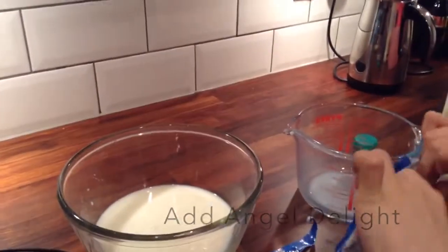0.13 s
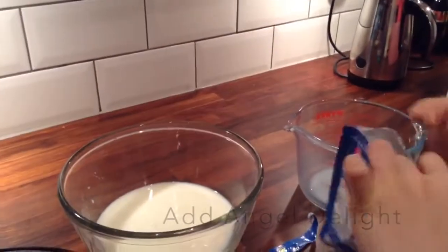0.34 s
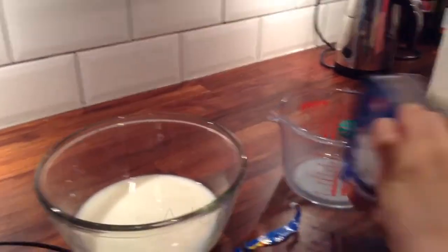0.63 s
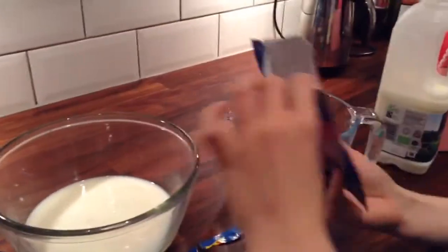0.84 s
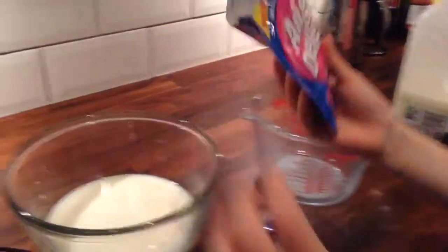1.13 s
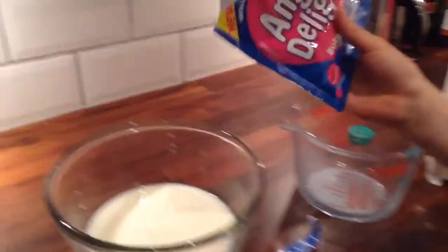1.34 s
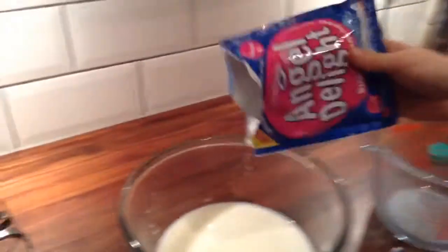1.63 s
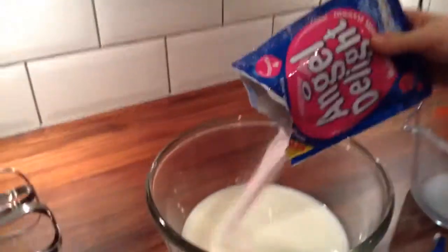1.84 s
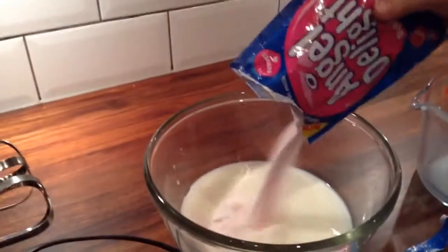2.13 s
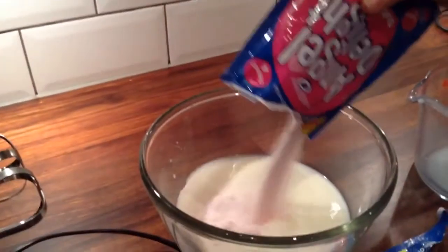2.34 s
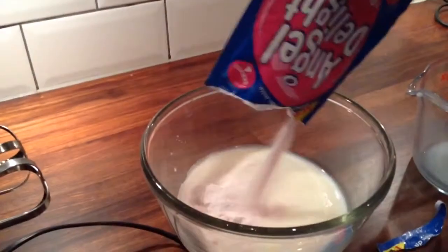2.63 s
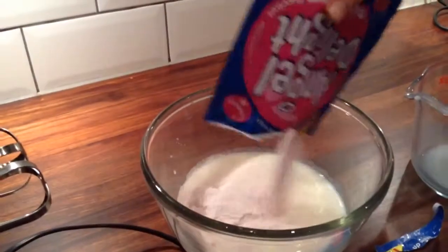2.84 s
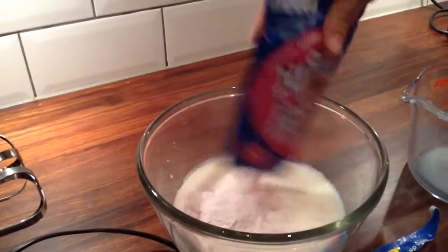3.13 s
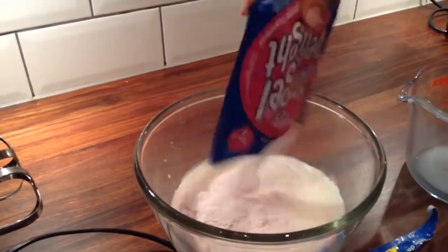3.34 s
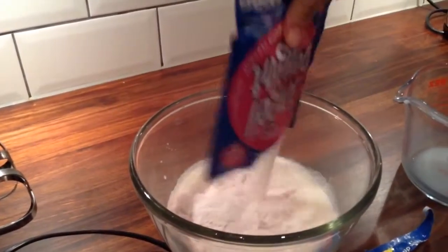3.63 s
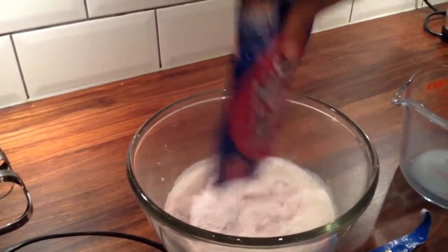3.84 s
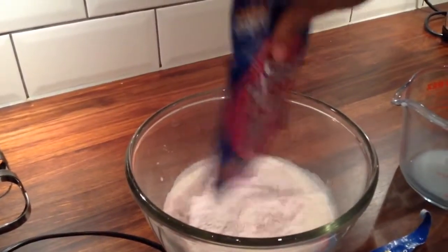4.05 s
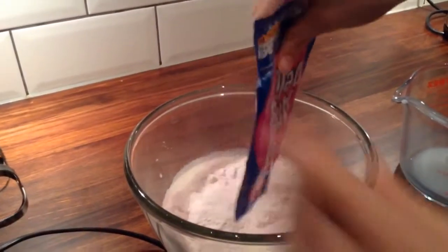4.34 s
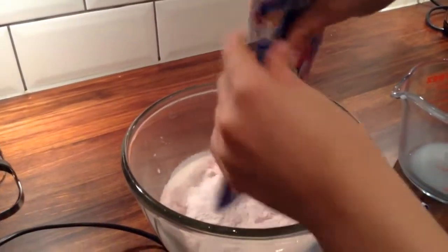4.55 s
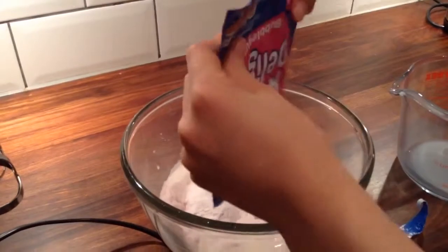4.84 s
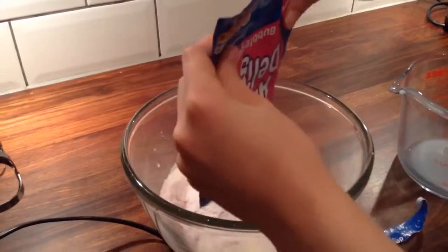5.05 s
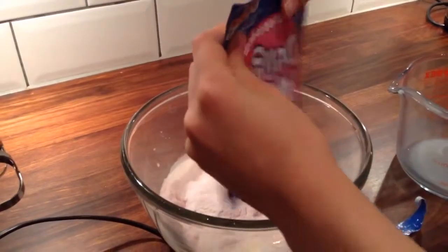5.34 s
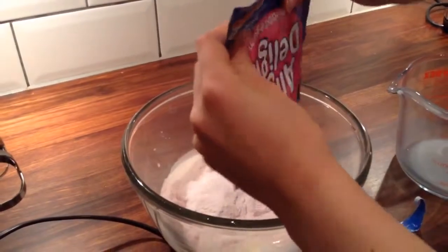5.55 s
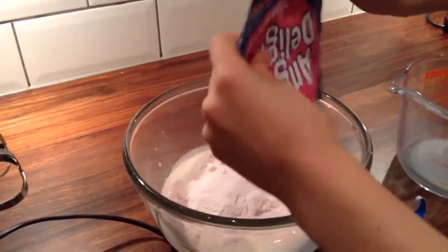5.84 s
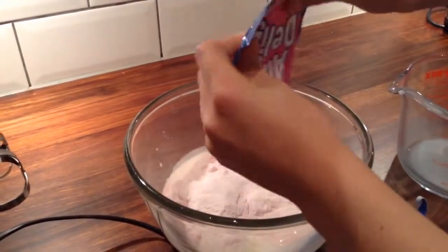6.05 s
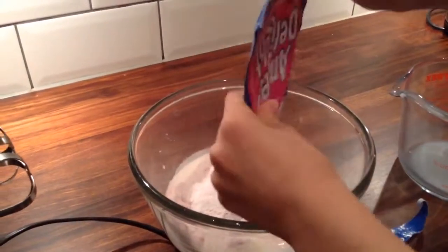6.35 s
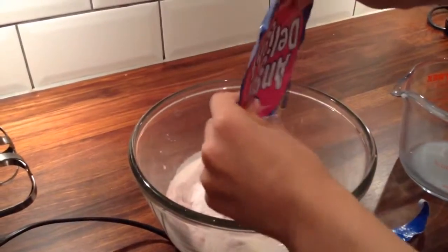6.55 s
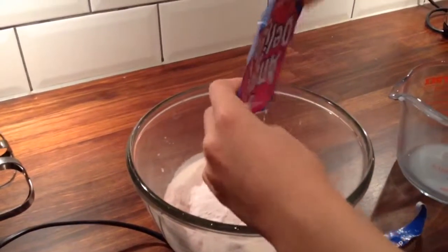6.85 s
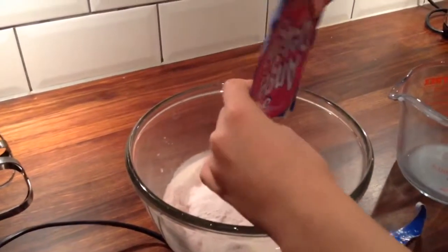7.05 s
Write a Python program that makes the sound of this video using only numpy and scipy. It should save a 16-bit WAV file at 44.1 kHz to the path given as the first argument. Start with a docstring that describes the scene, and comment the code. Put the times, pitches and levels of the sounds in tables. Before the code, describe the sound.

Crisp crackling film close by, one hard pop, then a quieter stretch of small handling bumps. Dry powder runs out in a grainy hiss with rhythmic shakes, ending as scattered film snaps grow into busy crumpling. A bowl's hollow adds faint ringing and tiles give short reverberation. Steady low room noise with a thin appliance hum lies beneath, picked up by a small nearby microphone.

```python
"""A plastic sachet is pulled open in sharp snaps, carried over a glass bowl of milk in a tiled kitchen, and shaken.
First the stiff film buckles: panels ring, the pouch puffs and creases crack, with rustling under the fingers.
Small dull knocks follow as the sachet is tipped; then powder hisses out as dense grains, surging with each shake.
Later the film snaps and rustles again, coloured by resonances of the bowl's hollow and by close echoes.
Soft handling bumps come and go; filtered noise and a thin hum form a low room drone throughout."""
import sys
import numpy as np
from scipy import signal
from scipy.fft import rfft, irfft, next_fast_len
from scipy.io import wavfile

SR = 44100
rng = np.random.default_rng(int(sys.argv[2]) if len(sys.argv) > 2 else 0)


def put_to_file(sound):
    """Save the sound as 16-bit audio at rate SR, in the file named by the first command-line argument."""
    columns = np.atleast_2d(sound).T  # one column per channel
    safe = np.clip(columns, -1, 1)
    whole_steps = np.round(safe * 32767)
    wavfile.write(sys.argv[1], SR, whole_steps.astype(np.int16))


N = 317079
T = np.arange(N) / SR  # time [s]
FILTERS = {}  # band-passes, designed once each
# kitchen reverberation times [s]
PUFF_T60, PANEL_T60, CRACK_T60, EDGE_T60 = 0.59, 0.4, 0.46, 0.32
# film patches set ringing by small creases and buckles: (pitch [Hz], relative level [dB])
FILM_PATCHES = [(420, -2), (560, 1.5), (720, -12.5), (900, -2.5), (1100, 2), (1300, -1), (1500, -2.5),
                (1750, -1), (2050, -2.5), (2500, -8)]


def from_db(db):
    """Decibels to gain."""
    return 10 ** (np.asarray(db) / 20)


def rms_one(x):
    """Scale to unit power."""
    return x / np.sqrt(np.mean(x ** 2) + 1e-20)


def level_curve(rows):
    """Gain over time from (time [s], level [dB]) rows, fading to silence beyond their ends."""
    s, db = np.transpose(rows)
    fade = np.interp(T, [s[0] - .03, s[0], s[-1], s[-1] + 0.019], [0, 1, 1, 0])
    return from_db(np.interp(T, s, db)) * fade


def at_hz(points, hz):
    """Read a spectrum on a log-frequency scale."""
    table = np.array(points)
    return np.interp(np.log(hz + 1), np.log(table[:, 0]), table[:, 1])


def band(x, low_hz, high_hz, order=2):
    """Causal band-pass."""
    edges = (order, low_hz, min(high_hz, .45 * SR))
    if edges not in FILTERS:
        FILTERS[edges] = signal.butter(order, edges[1:], "band", fs=SR, output="sos")
    return signal.sosfilt(FILTERS[edges], x)


def resonance(x, hz, width_hz):
    """Two-pole resonance with gain 1 on top."""
    r = np.exp(-np.pi * width_hz / SR)
    feedback = [1, -2 * r * np.cos(2 * np.pi * hz / SR), r * r]
    return signal.lfilter(np.array([1, 0, -1]) * (1 - r * r) / 2, feedback, x)


def coloured(x, spectrum):
    """Give a steady sound a spectrum; unit power."""
    size = next_fast_len(N)
    gain = from_db(at_hz(spectrum, np.fft.rfftfreq(size, 1 / SR)))
    return rms_one(irfft(rfft(x, size) * gain, size)[:N])


def drift(rate):
    """Smooth chance of unit power, with `rate` new values per second."""
    knots = rng.standard_normal(2000)
    return rms_one(np.interp(T * rate, np.arange(len(knots)), knots))


def grains(per_s, spread_db, size=N):
    """Random clicks of either sign, their levels in dB spread exponentially."""
    clicks = np.zeros(size)
    at = np.flatnonzero(rng.random(size) < per_s / SR)
    excess = rng.standard_exponential(size)[at]
    sign = np.sign(rng.random(size)[at] - .5)
    clicks[at] = sign * from_db(spread_db * np.minimum(excess, 4))
    return clicks


def gesture(s, rise_s, hold_s, fall_s):
    """A movement builds up, holds and dies away."""
    rise = np.clip((T - s) / rise_s, 0, 1)
    return rise * np.exp(-np.clip((T - s - rise_s - hold_s) / fall_s, 0, 20))


def add(track, s, sound):
    """Mix a sound in at a given time."""
    at = max(0, round(s * SR))
    track[at:at + len(sound)] += sound[:max(0, N - at)]


def snaps(settle_s=0.0043, crease_s=0.0075, panel_flip=0.55, panel_room_db=-0.65, clean_above_db=-42,
          firm_db=22, room_db=-5.5, close_room_db=-12, level_db=-3.5):
    """Each buckle rings a panel of film, puffs the pouch, cracks along a crease and fizzes at the top."""
    # buckles of the film: (time [s], panel pitch [Hz], panel level before level_db [dB],
    # crack level re panel [dB], top edge level re panel [dB], relative strength of the first flip [ratio])
    buckle_events = [(0.056, 1460, -48, -4, -5.5, .3), (0.079, 1000, -48, -14, -18, .5),
                     (0.1208, 1450, -43.5, -13, -12, 1.1), (0.1672, 1330, -38.5, -14.5, -12.5, 0.42),
                     (0.189, 1750, -48, -22, -29, .3), (0.206, 1780, -56.5, -22, -28, .3),
                     (0.237, 1700, -68, -26, -25, .3), (0.316, 1250, -49, -22, -34, .2),
                     (0.323, 1530, -52, -33, -30, .2), (0.3614, 880, -49.5, -10, -26, 1.4),
                     (0.3751, 1470, -29, -4.5, -6, 0.18), (0.693, 1990, -62.5, -14, -20, .3),
                     (0.7317, 890, -52, -11, -32, 1.1), (0.796, 1420, -52, -22, -30, 0.92),
                     (0.9223, 1390, -47, -9, -7.5, 1.4), (3.1394, 1740, -48, -7.5, -8, .7),
                     (3.1739, 1540, -56, -8, -18, .6), (3.2387, 1070, -59, -7, -10, 0.58),
                     (3.344, 1820, -52, -8, -25, 1.2), (3.3632, 1110, -45.5, -10, -25, .6),
                     (3.3743, 1650, -39.5, -4, -19, 0.65), (3.3881, 1350, -36.5, -4, -22, 0.75),
                     (3.402, 1900, -56, -2, -18, .7), (3.443, 2000, -58, -12, -24, .5),
                     (3.492, 1110, -60.5, -6, -20, .5), (3.5903, 1150, -40, -11, -20, 0.25),
                     (3.651, 780, -55.5, -14, -22, 0.77), (3.8983, 1540, -63, -6, -20, .8),
                     (4.048, 740, -54, -18, -22, 0.44), (4.0782, 1720, -32, -2.5, -8, .25),
                     (4.1054, 2070, -34.5, -12, -30, .9), (4.1324, 1880, -32, -2.5, -2.5, 0.28),
                     (4.292, 2260, -56, -11, -9, .4), (4.3357, 1870, -42.5, -2, -20, 0.47),
                     (4.371, 1030, -43.5, -2.5, -17, 0.23), (4.585, 900, -55.5, -7, -13, 0.46),
                     (4.601, 1020, -54, 1, -7, 0.5), (4.632, 700, -54, -19, -11, 0.43),
                     (4.6459, 1040, -48, -2, -10, .9), (4.6704, 1580, -34.5, 10.5, 4, 1.1),
                     (4.679, 1720, -41, 5.5, -9, .4), (4.6995, 1500, -44, 4, -13, 0.66),
                     (4.856, 1150, -52.5, -7, -10, .5), (4.8723, 2034, -43, 0.5, -15, 1.5),
                     (4.896, 1210, -47.5, -6, -18, .4), (4.9076, 1220, -48, 6.5, -6, 0.54),
                     (4.938, 1130, -52, 13.5, 9, 0.62), (4.9547, 1290, -42, -4, -8, .8),
                     (4.9605, 700, -46.5, -11, -18, 0.66), (5.0487, 1140, -50.5, -5, -6, 1.4),
                     (5.1922, 1170, -59.5, -5, -3, 0.32), (5.229, 1620, -51, 1, 3, 0.63),
                     (5.353, 1060, -50.5, -16, -3, .6), (5.3778, 730, -44, -18, -9, 0.54),
                     (5.389, 1140, -44.5, -3, -9, .5), (5.398, 900, -54.5, 6, 10, 0.36),
                     (5.418, 1400, -41, -8.5, -26, 0.31), (5.5586, 1320, -52, -6, -25, 0.71),
                     (5.64, 1520, -46, -9, -12, .3), (5.662, 1500, -44.5, -4, -6, 0.4),
                     (5.7657, 1160, -49.5, -3, -8, .4), (5.785, 850, -40, -7, -11, 0.98),
                     (5.7891, 1520, -40.5, 4, -3.5, .6), (5.8198, 1590, -41, 2, -9, 0.52),
                     (5.8309, 1080, -42.5, -3, -25, 1.2), (5.887, 1530, -46.5, -6, -21, 0.76),
                     (5.94, 1400, -49, 1.5, -10, 0.89), (5.9832, 850, -37, -2.5, -8, .6),
                     (6.005, 700, -46, 0, -8, 0.55), (6.036, 1190, -47.5, 1.5, -22, 0.8),
                     (6.05, 1270, -42, -10, -24, 0.62), (6.09, 1010, -53, -11, -19, 0.68),
                     (6.1431, 910, -55, -3, -14.5, 0.55), (6.1942, 960, -49.5, -15, -16, 0.81),
                     (6.225, 1530, -59, -17, -18, 0.62), (6.272, 1540, -60, 0, -2, 0.8),
                     (6.298, 695, -60, 7, 3, .5), (6.362, 1100, -44.5, -4, -15, 0.32),
                     (6.3857, 1120, -47.5, 5, -6, 0.59), (6.392, 1080, -39, -12, -18, 0.22),
                     (6.432, 1100, -54, -6, -4, 0.57), (6.4777, 1110, -43.5, 1, 3, 0.38),
                     (6.4968, 1070, -51.5, 14, 6.5, 0.46), (6.521, 695, -51, -4, -18, .8),
                     (6.723, 1160, -48.5, -2.5, -18, 0.45), (6.7536, 1250, -55.5, 1.5, 2, 0.54),
                     (7.15, 1410, -49.5, 2, -3.5, 0.33)]
    # the puff is weaker in the early snaps: (time [s], puff level change [dB])
    puff_change = [(0.4, -5), (1.7, 1), (3.3, 1)]
    # strength of the later slips: (time [s], factor [0-1])
    slip_strength = [(0.4, 0.72), (3.3, 0.6)]
    # overtone grows with hardness: (panel level [dB], overtone share [ratio], top of ring over pitch [ratio])
    hardness = [(-51.5, 0.055, 1.61), (-39, 0.13, 1.91), (-27, 0.4, 1.5)]
    # a puff takes up only part of a harder snap: its level at a typical panel level, and dB per panel dB
    typical_puff_db, typical_panel_db, puff_follows = -50, -44, 0.69
    crease_centre_hz, scatter_octaves = 5000, 0.18
    hard_db, overtones, top_ratios = np.transpose(hardness)
    out = np.zeros(N)
    for s, hz, panel_db, crack_db, edge_db, flip in buckle_events:
        # hard snaps flip in one go, gentle ones crumple for longer
        loose = np.clip(1.0 - (panel_db - clean_above_db) / firm_db, .4, 1.3)
        # around 0.38 s the sachet is close by, then it is held further off
        wet_db = np.interp(s, [.2, .38, .9], [room_db, close_room_db, room_db])
        db = panel_db + level_db
        puff_db = typical_puff_db + puff_follows * (panel_db - typical_panel_db) + level_db
        puff_db += np.interp(s, *np.transpose(puff_change))
        crease_hz = crease_centre_hz * 2 ** (scatter_octaves * (2 * rng.random() - 1))
        slips = settling() * np.interp(s, *np.transpose(slip_strength))
        overtone = np.interp(panel_db, hard_db, overtones)
        top_ratio = np.interp(panel_db, hard_db, top_ratios)

        def ring(x):
            return panel(x, hz, overtone=overtone, top_ratio=top_ratio)

        def ring_all_sides(x):
            # the room hears all sides of the film, so more of its other modes
            return panel(x, hz, 0.4, overtone, top_ratio)

        add(out, s, snap_part(ring, db, settle_s * loose, panel_flip * flip, slips,
                              PANEL_T60, wet_db + panel_room_db, room_body=ring_all_sides))
        add(out, s, snap_part(pouch, puff_db, 0.0085 * loose, panel_flip * flip, slips, PUFF_T60, wet_db))
        add(out, s, snap_part(lambda x: crease(x, crease_hz), db + crack_db, crease_s * loose, flip, slips,
                              CRACK_T60, wet_db))
        add(out, s, snap_part(top_edge, db + edge_db, crease_s * loose, flip, slips, EDGE_T60, wet_db))
    return out


def snap_part(body, level_db, settle_s, flip, slips, t60, room_db, room_body=None):
    """A buckle, its later slips and its reverberation, heard through one resonant part of the sachet."""
    direct = body(buckle(T[:len(slips)], settle_s, flip) + slips + 1e-18)
    tail = (room_body or body)(kitchen(T[:SR // 4], t60))
    sound = from_db(room_db) * tail / np.linalg.norm(tail)
    sound[:len(direct)] += direct / np.linalg.norm(direct)
    # the level is the power of the direct sound spread over 10 ms
    return from_db(level_db) * np.sqrt(SR / 100) * sound


def buckle(t, settle_s, flip, build_s=0.00065):
    """One sudden flip of the film, then a flurry of smaller slips that spreads and dies; unit energy."""
    flurry = rng.standard_normal(len(t)) * np.exp(-t / settle_s) * (1 - np.exp(-t / build_s))
    push = flip * (t == 0) + flurry / np.linalg.norm(flurry)
    return push / np.linalg.norm(push)


def settling(slips_per_s=130, spread_db=2.5, relax_s=.022, level_db=-8):
    """After a buckle the film relaxes in a few small, uneven slips."""
    t = T[:SR // 14]
    slips = grains(slips_per_s, spread_db, len(t)) * np.exp(-t / relax_s)
    return from_db(level_db) * slips / (np.linalg.norm(slips) + 1e-9)


def panel(x, hz, broad=.12, overtone=.1, top_ratio=1.8, low_share=.62, q=4.2, overtone_ratio=1.76):
    """A patch of film rings briefly at its own pitch and an overtone, over a spread of other modes."""
    ring = resonance(x, hz, hz / q) + overtone * resonance(x, hz * overtone_ratio, hz / q)
    return band(ring + broad * x, low_share * hz, np.clip(top_ratio * hz, 1700, 3100), order=3)


def pouch(x, boom_hz=192, width_hz=80, boom=0.42):
    """The air in the pouch gives a dull puff with a short low boom."""
    return band(x + boom * resonance(x, boom_hz, width_hz), 168, 783, order=4)


def crease(x, hz, q=4.0):
    """A crease cracks over a broad band and rings very briefly at its own pitch."""
    return band(band(x, 3300, 5030, order=1) + resonance(x, hz, hz / q), 2260, 7700)


def top_edge(x):
    """The topmost band of a crack gives it a crisp edge."""
    return band(band(x, 4900, 8750, order=1), 7150, 14700)


def rustle(clump_db=-0.5, creases_per_s=70, patch_width_hz=170, crumple_level_db=-4, buckles_db=-5, cracks_db=-8):
    """Under each grip tiny creases give way in clumps and patches flip; sliding skin hisses with cracks."""
    # the fingers shift their grip and work the film:
    # (time [s], length [s], relative crumple level [dB], relative slide level [dB])
    grips = [(-0.02, 0.083, -54, -67.5), (0.122, 0.06, -57, -61.5), (0.719, 0.054, -61, -60.5),
             (0.849, 0.13, -60, -69.5), (3.619, 0.11, -63.5, -66.5), (4.215, 0.2, -63, -64),
             (4.587, 0.15, -53.5, -73), (4.863, 0.16, -64, -60), (5.202, 0.043, -57, -60),
             (5.292, 0.11, -59.5, -58), (5.647, 0.034, -53, -58), (5.772, 0.15, -56, -61.5),
             (5.975, 0.08, -54, -61), (6.1, 0.28, -68.5, -72.5), (6.392, 0.135, -55, -59.5),
             (6.763, 0.05, -60, -61.5)]
    # hiss of sliding skin: (frequency [Hz], relative level [dB per Hz])
    slide_spectrum = [(500, -24), (2000, -26), (3500, 2.5), (5500, -2.5), (9000, -4.5), (15000, -15)]
    rise_share, fall_s = 0.36, 0.0043
    clumps = from_db(clump_db * drift(110))
    creases = np.zeros(N)
    for hz, db in FILM_PATCHES:
        clicks = grains(creases_per_s, spread_db=0.0) * clumps
        creases += from_db(db) * resonance(clicks, hz, patch_width_hz)
    rings, cracks = small_buckles()
    crumple = from_db(crumple_level_db) * rms_one(band(creases, 150, 4200)) + from_db(buckles_db) * rings
    hiss = coloured(grains(1800, spread_db=2.5) * clumps, slide_spectrum)
    slide = hiss + from_db(cracks_db) * cracks
    out = np.zeros(N)
    for s, length_s, crumple_db, slide_db in grips:
        movement = gesture(s, rise_share * length_s, (1 - rise_share) * length_s, fall_s)
        out += movement * (from_db(crumple_db) * crumple + from_db(slide_db) * slide)
    return out


def small_buckles(per_patch_per_s=8.0, settle_s=0.0019, puff_db=-8):
    """Patches flip at random: their rings with a faint puff, and their cracks; each of unit power."""
    flips = []
    for _ in FILM_PATCHES:
        clicks = grains(per_patch_per_s, spread_db=-1.0)
        push = buckle(T[:SR // 20], settle_s, flip=0.63)
        flips.append(signal.oaconvolve(clicks, push)[:N] + 1e-18)
    rings = sum(from_db(db) * panel(flip, hz) for flip, (hz, db) in zip(flips, FILM_PATCHES))
    cracks = band(sum(flips), 2800, 8800)
    puffs = band(sum(flips), 150, 356, order=3)
    return rms_one(rms_one(rings) + from_db(puff_db) * rms_one(puffs)), rms_one(cracks)


def powder(level_db=-1, flutter_db=2.0):
    """Countless grains slide over the film: a trickle, and a surge with each shake."""
    # powder running out of the tipped sachet: (time [s], flow level before level_db [dB])
    pour = [(1.58, -71.5), (1.74, -58), (1.85, -60.5), (2.41, -62.5), (2.57, -73), (2.75, -65),
            (3.0, -64.5), (3.55, -59.5), (3.9, -74), (4.5, -74)]
    # each shake throws out a surge: (time [s], surge level before level_db [dB])
    shakes = [(2.24, -59.5), (2.82, -66), (3.027, -57.5), (3.24, -59), (3.48, -65), (3.742, -62.5),
              (3.955, -57), (4.22, -61), (4.5, -64.5)]
    # hiss of the grains: (frequency [Hz], relative level [dB per Hz])
    powder_spectrum = [(300, -12), (800, -10), (1500, 0), (2600, -8.5), (4000, -1), (6500, 1),
                       (10000, -0.5), (15000, -4.5)]
    flow = level_curve(pour)
    for s, db in shakes:
        flow += from_db(db) * gesture(s, rise_s=0.023, hold_s=0.035, fall_s=0.045)
    stream = grains(14000, spread_db=3.0) * from_db(flutter_db * drift(23.06))
    return from_db(level_db) * flow * band(coloured(stream, powder_spectrum), 220, 19000)


def bumps(level_db=2, width_hz=110, knock=0.61, room=0.34):
    """Soft, heavily damped knocks of the handling."""
    # (time [s], peak level before level_db [dB], pitch [Hz])
    bump_events = [(0.154, -51, 172), (0.71, -51, 196), (1.443, -49, 190), (1.553, -55, 160),
                   (1.606, -54.5, 205), (1.748, -42.5, 178), (1.79, -58, 160), (1.9, -63, 240),
                   (2.052, -52, 165), (2.11, -57.5, 310), (2.331, -60, 326), (3.001, -61, 180),
                   (4.026, -45, 230), (4.992, -47.5, 198), (5.232, -50.5, 192), (6.184, -49.5, 204),
                   (6.299, -50, 201), (6.494, -41, 192)]
    out, t = np.zeros(N), T[:SR // 3]
    for s, peak_db, hz in bump_events:
        push = buckle(t, settle_s=0.014, flip=1.0) + room * kitchen(t, PUFF_T60)
        thud = rms_one(band(resonance(push, hz, width_hz), 131, 446, order=3))
        thud += knock * rms_one(band(push, 185, 514))
        add(out, s, from_db(peak_db + level_db) * thud / np.abs(thud).max())
    return out


def fumbling(level_db=-75, knocks_per_s=45, start_s=1.0, rise_s=0.17, hold_s=0.87, fall_s=0.22):
    """Small dull knocks while the sachet is carried over and tipped."""
    knocks = rms_one(band(grains(knocks_per_s, spread_db=5.0), 136, 307, order=3))
    return from_db(level_db) * gesture(start_s, rise_s, hold_s, fall_s) * knocks


def bowl(x, far_db=-12, near_db=-1.5):
    """The air in the bowl's hollow resonates, answering more as the sachet comes over it."""
    # (pitch [Hz], width [Hz], level before the nearness gain [dB])
    bowl_modes = [(560, 34, -16), (660, 16, 0.5), (783, 39, 1), (1107, 43, 7), (1530, 110, 1.5),
                  (1963, 120, 0.5), (2010, 29, -32), (2500, 740, 1)]
    nearness = from_db(np.interp(T, [1.2, 2.2], [far_db, near_db]))
    return x + sum(from_db(db) * resonance(x * nearness, hz, width_hz) for hz, width_hz, db in bowl_modes)


def reflections(x):
    """Bowl, worktop and tiles throw back close echoes."""
    # (delay [s], level [dB])
    echoes = [(.0029, -32), (.0088, -36), (0.0094, -20)]
    out = x.copy()
    for delay_s, db in echoes:
        add(out, delay_s, from_db(db) * x)
    return out


def kitchen(t, t60, build_s=.010):
    """The room's answer to a click, of unit energy; new each time, since the sachet keeps moving."""
    decay = np.exp(-np.log(1000) * t / t60)
    tail = (rng.random(len(t)) - .5) * decay * np.minimum(t / build_s, 1)
    return tail / np.linalg.norm(tail)


def background(floor_db=-68, hum_hz=229.3, hum_db=-74, wander_hz=0.92, waver_db=1.0):
    """Steady room noise with the thin, slightly wavering hum of an appliance."""
    # room noise: (frequency [Hz], relative level [dB per Hz])
    floor_spectrum = [(25, -0.5), (60, -15.5), (100, -16.5), (140, -6), (200, 0), (300, -3.5), (450, -9.5),
                      (900, -13), (2000, -17), (5000, -21.5), (10000, -21.5), (15000, -24.5)]
    phase = 2 * np.pi * np.cumsum(hum_hz + wander_hz * drift(6.3)) / SR
    hum = from_db(hum_db + waver_db * drift(7.7)) * rms_one(np.sin(phase))
    return from_db(floor_db) * coloured(rng.standard_normal(N), floor_spectrum) + hum


def scene(hiss_room_db=-6):
    """Sachet and powder over the bowl, heard in the kitchen."""
    hiss = rustle() + powder()
    hiss_tail = signal.oaconvolve(hiss, kitchen(T[:SR // 3], CRACK_T60))[:N]
    hiss = hiss + from_db(hiss_room_db) * hiss_tail
    over_bowl = reflections(bowl(snaps() + hiss))
    return (over_bowl + bumps() + fumbling() + background())[None]


def record(dry, low_cut_hz=105, cutoff_hz=15600):
    """A small microphone without deep bass; the top is cut steeply."""
    thin = signal.sosfilt(signal.butter(2, low_cut_hz, "high", fs=SR, output="sos"), dry)
    return signal.sosfilt(signal.ellip(10, .2, 70, cutoff_hz, fs=SR, output="sos"), thin)


dry = scene()
out = record(dry)
put_to_file(out)
```